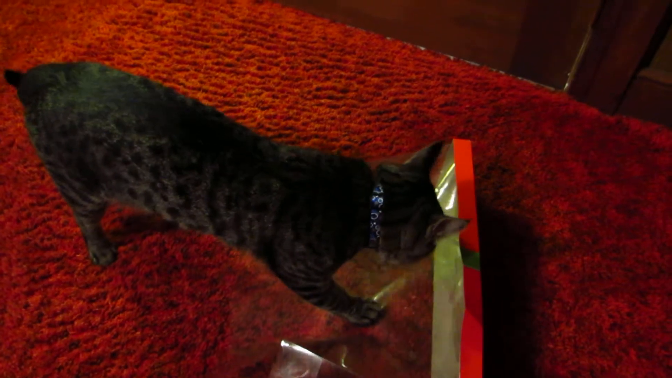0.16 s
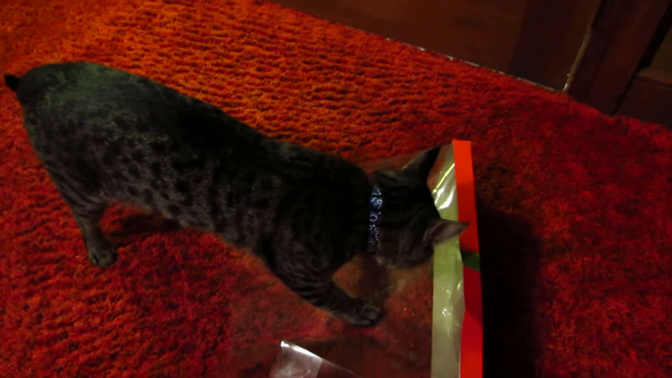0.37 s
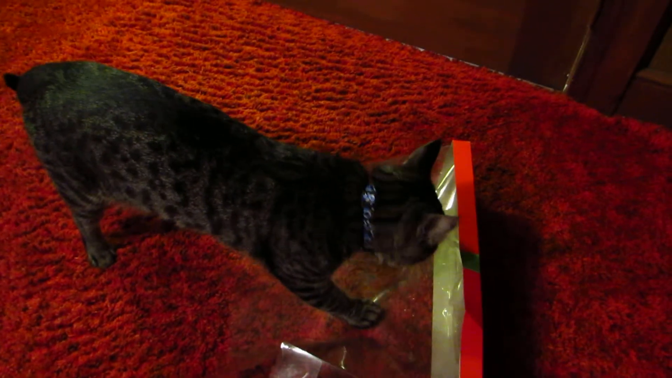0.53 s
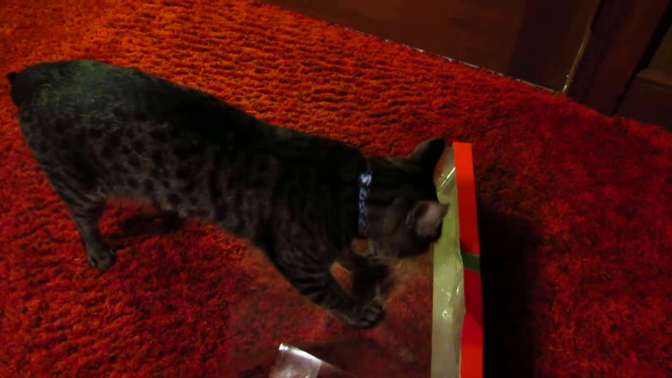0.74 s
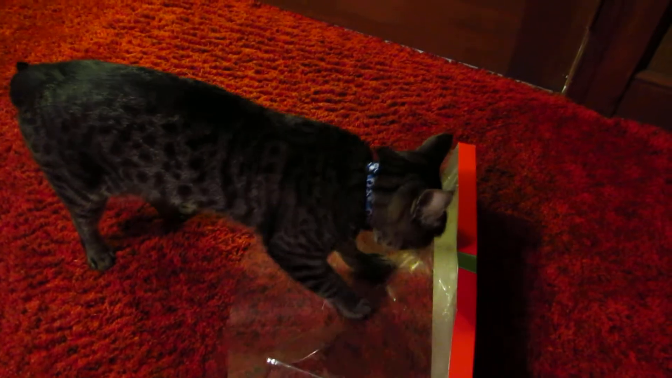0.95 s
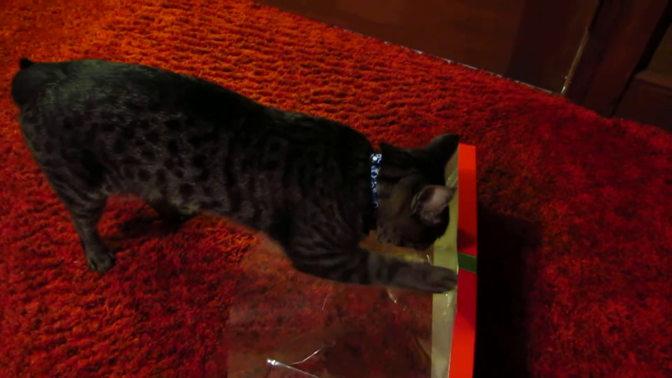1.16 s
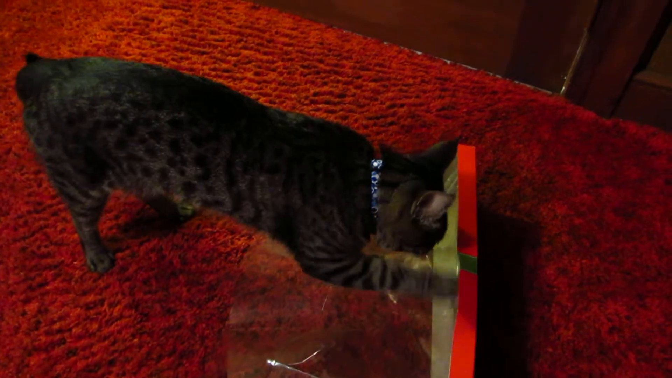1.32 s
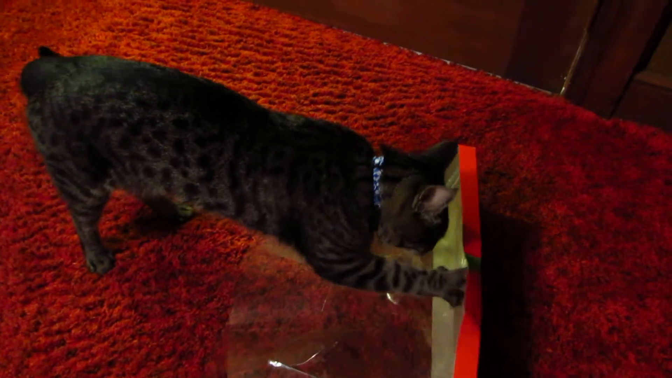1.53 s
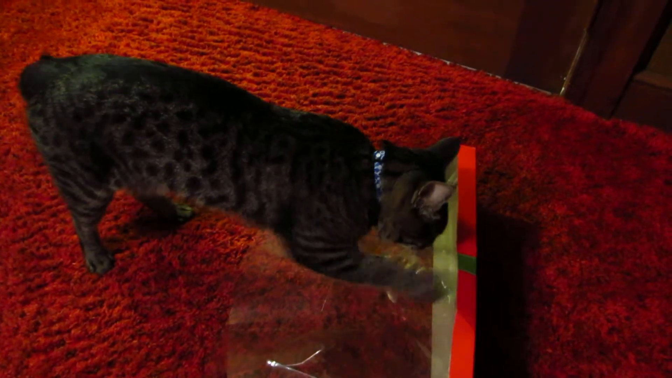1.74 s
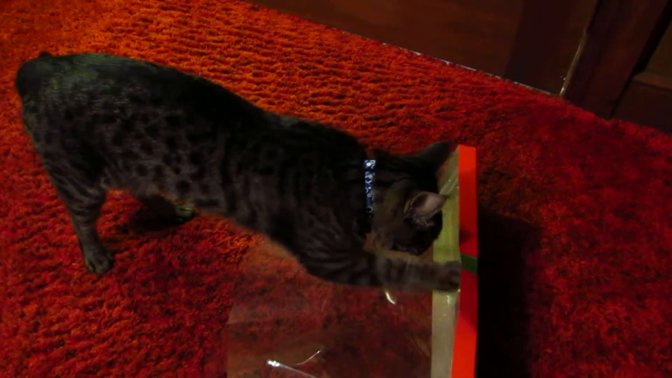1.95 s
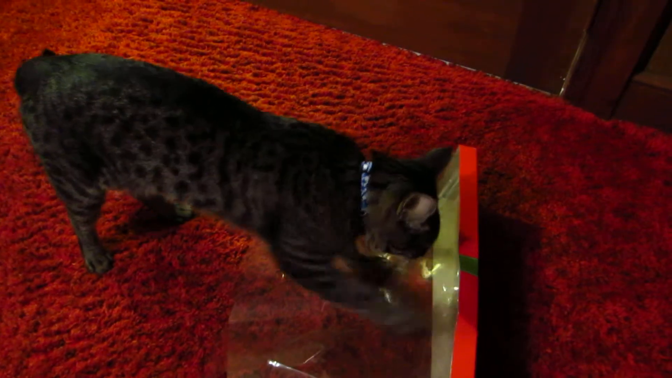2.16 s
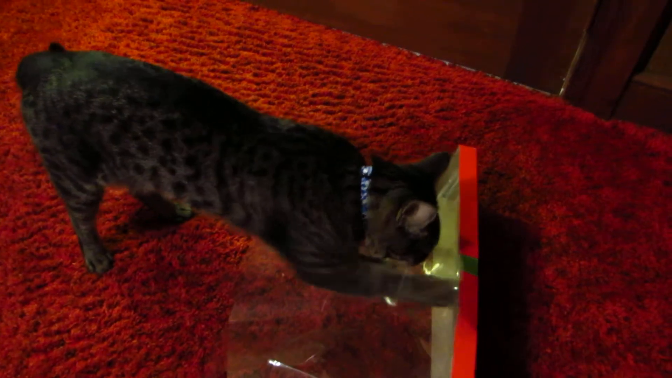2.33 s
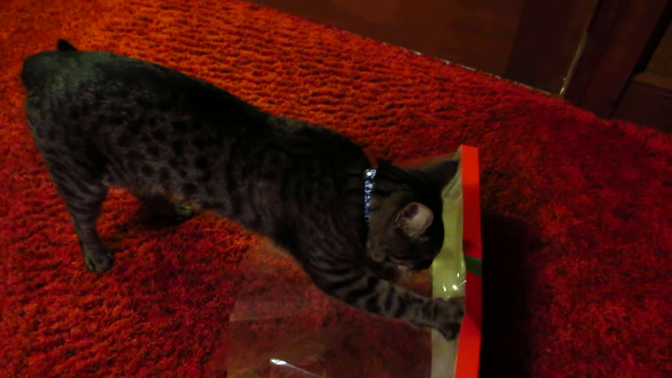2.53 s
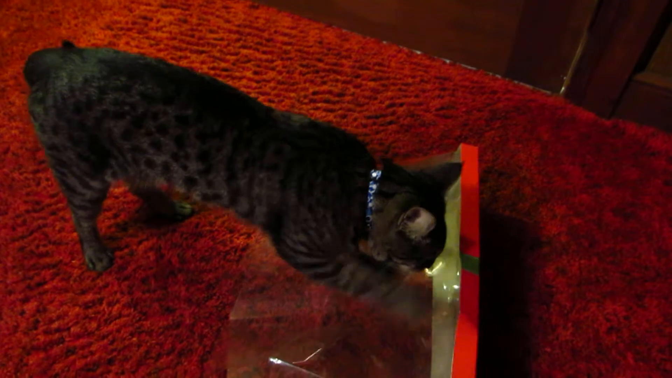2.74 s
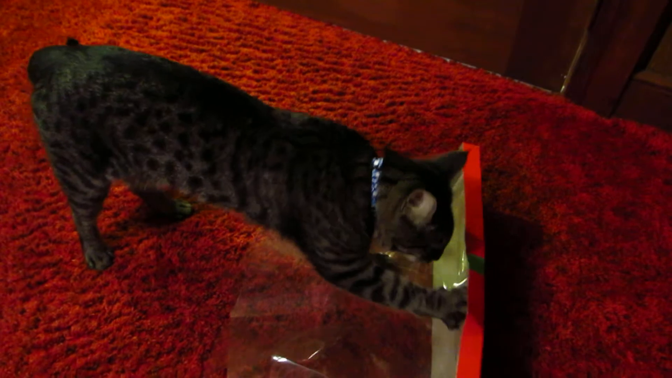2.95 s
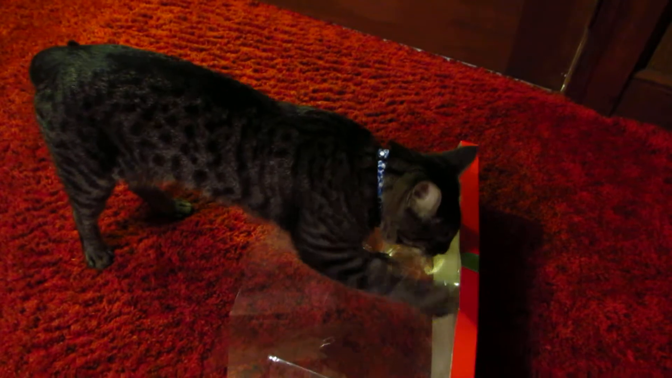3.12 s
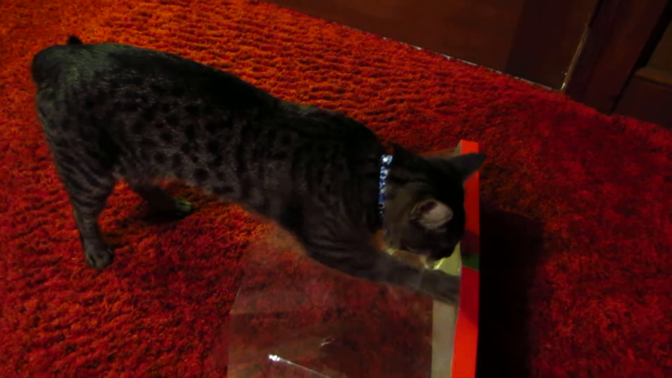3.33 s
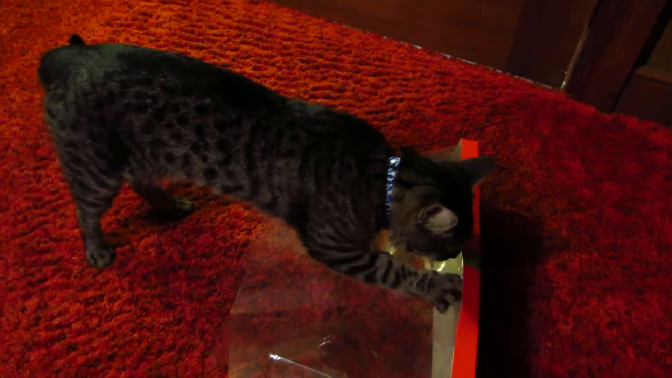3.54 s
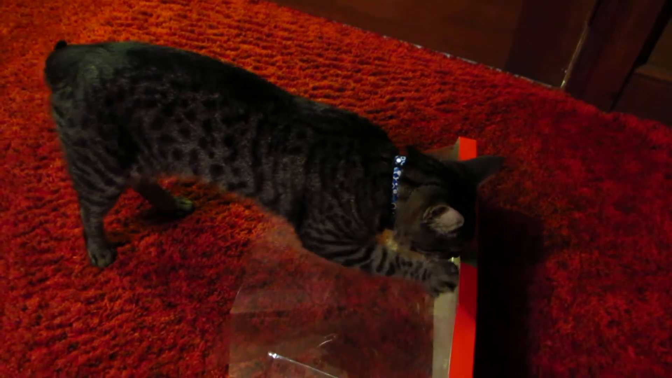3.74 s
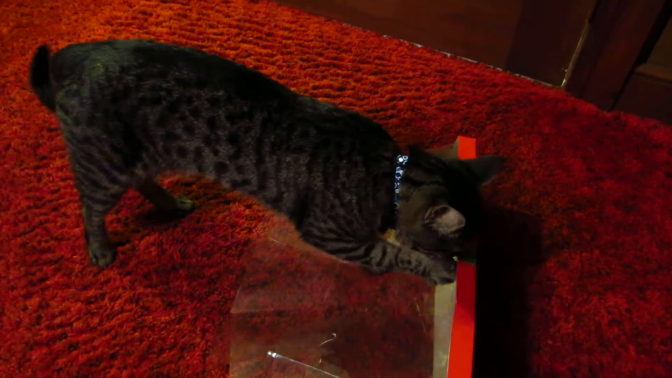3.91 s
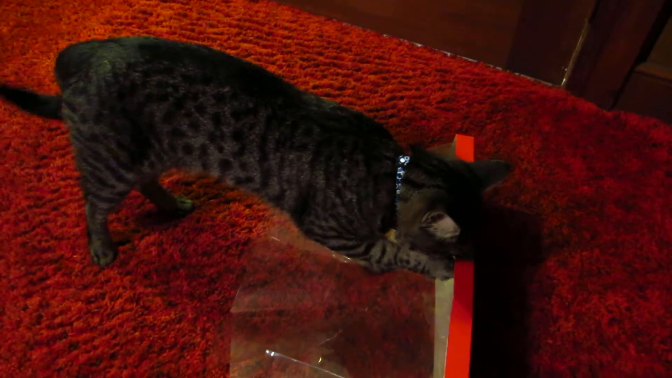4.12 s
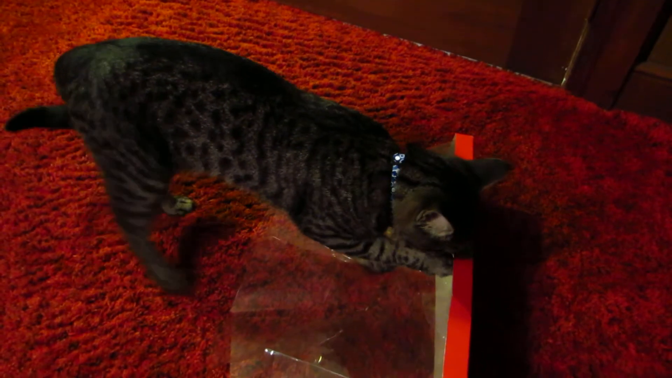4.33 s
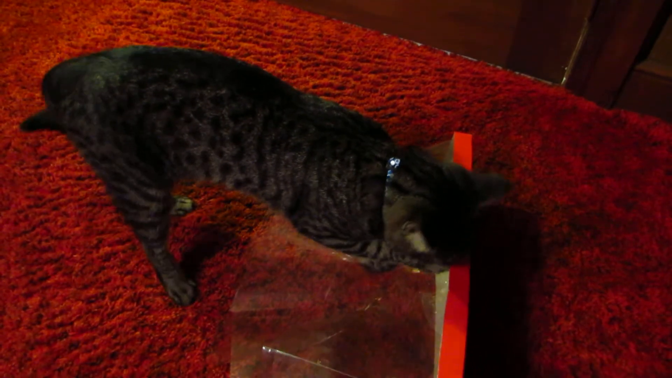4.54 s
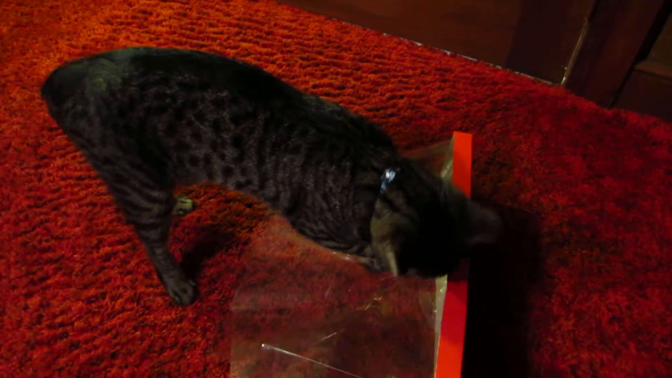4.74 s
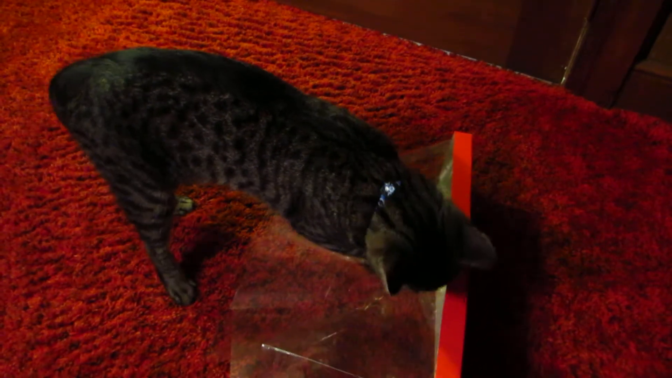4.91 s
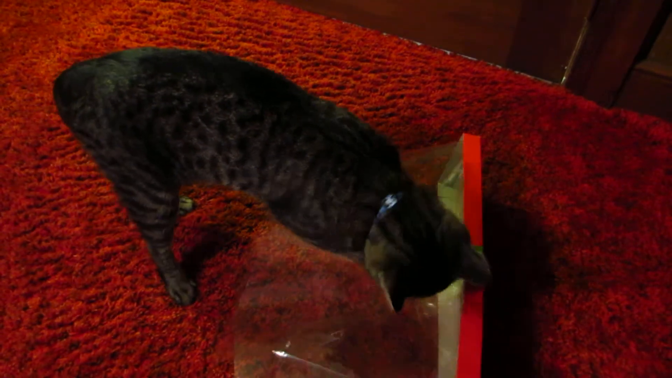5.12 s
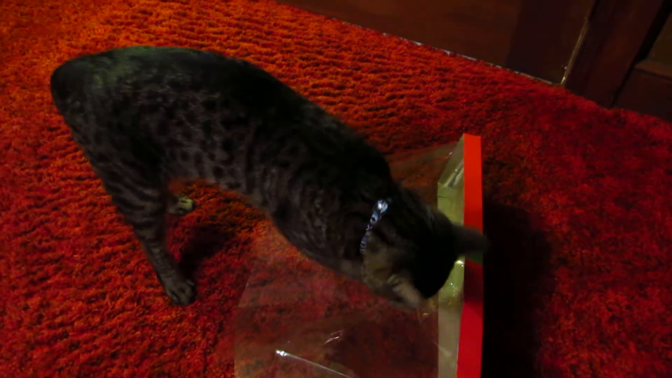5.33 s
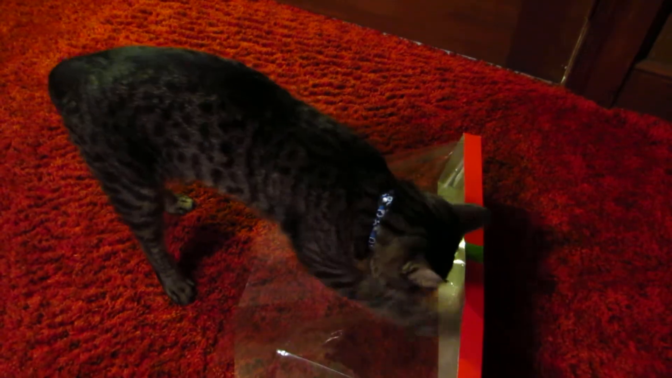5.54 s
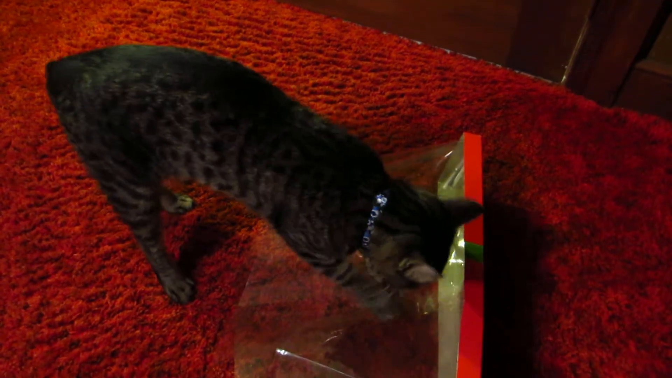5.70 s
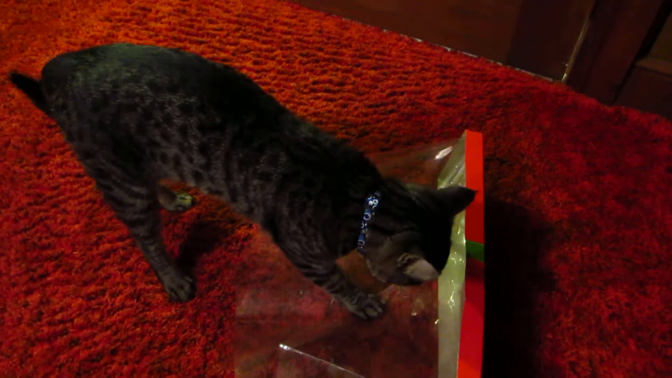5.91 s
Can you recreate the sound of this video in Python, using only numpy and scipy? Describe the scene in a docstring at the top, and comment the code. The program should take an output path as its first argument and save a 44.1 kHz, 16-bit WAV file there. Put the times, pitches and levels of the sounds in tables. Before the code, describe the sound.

In a small quiet room, a cat paws at stiff plastic film stretched over a light cardboard box on carpet, heard closely in stereo. At 0 s a short faint slide and light taps sit over soft, low room hush, with small touches until 0.65 s. A hard, clicky knock lands at 0.7 s, followed by quick hollow thuds near 0.9 s. Pawing continues unevenly: lighter around 1.3 s, firmer at 1.65 and 2.0 s, then dense from 2.4 to 3.4 s with boxy thumps, dry claw ticks and brief hissing rubs. The strongest strikes come around 3.05-3.1 s. After softer pats, a sharp crack at 4.15 s leads into a lull. Single bursts snap at about 4.75 and 5.1 s, the latter brightest. Light thuds, scratches and slides from 5.45 s fade into small touches by 6 s. Short room tails follow the hits.

```python
"""A cat paws at a stiff plastic film stretched on a cardboard box lying on a carpet.
First a short slide hisses over the quiet hush of a small room, with light thuds and claw ticks.
From a hard knock at 0.7 s the pawing is busy until 4.2 s, then comes in bursts near 4.8 and 5.1 s,
and light thuds, ticks and slides end it. Thuds and ticks are uneven slips that shake box and film;
slides and hush are coloured noise; scattered echoes and room tails answer each hit."""
import sys
import numpy as np
from scipy import signal
from scipy.fft import rfft, irfft, next_fast_len
from scipy.io import wavfile
from scipy.ndimage import uniform_filter1d

SR = 44100
rng = np.random.default_rng(int(sys.argv[2]) if len(sys.argv) > 2 else 0)


def inscribe(sig):
    """Save sig as 16-bit PCM at rate SR to the path in sys.argv[1].

    A 1-D sig is mono; a 2-D sig holds one channel per row.
    Samples are clipped to [-1, 1] before scaling.
    """
    pcm = np.round(np.clip(np.atleast_2d(sig).T, -1, 1) * 32767)
    wavfile.write(sys.argv[1], SR, pcm.astype(np.int16))


def elevation(decibels):
    """Turn decibel levels (scalar or array-like) into linear amplitude ratios."""
    levels = np.asarray(decibels, float)
    return 10 ** (levels / 20)


N = 267687  # length in samples

# Pads and fur sliding on the film, one stroke a row.
# Each row: start in seconds, length in seconds, level at the start in dB, level at the end in dB.
STROKES = [(0, 0.02, -49, -44), (0.256, .22, -58.5, -53), (0.803, .21, -46, -57), (1.334, 0.47, -69, -55),
           (1.966, 0.24, -51, -57), (2.352, 0.11, -41.5, -52), (2.43, 0.3, -48, -50.5),
           (2.84, 0.12, -55, -44), (3.042, 0.17, -45, -58), (3.355, 0.06, -38, -54),
           (3.596, 0.035, -45, -45.5), (3.9, .5, -58, -66), (5.504, 0.096, -46, -45), (5.75, 0.1, -57, -49),
           (5.887, 0.097, -46, -47.5), (6.028, .04, -52, -52)]
STROKE_RISE_S, STROKE_FADE_DB_PER_S = 0.014, 400
# Tone of the slide. Each row: frequency in Hz, relative level per Hz in dB.
SLIDE_COLOUR = [(400, -1), (1200, 2.5), (3000, 6), (5000, -1), (9000, -5.5), (13000, -9.5), (15500, -44)]

# Level of the hush, which swells slowly and dips at times. Each row: time in seconds, level in dB.
HUSH_LEVEL = [(0, -50), (.2, -55.5), (.55, -52.5), (.7, -47), (1.1, -49), (1.5, -45), (2.8, -43.5),
              (3.7, -41.5), (4.2, -44.5), (5.08, -42.5), (5.45, -49.5), (5.72, -44), (6.07, -41.5)]
# Tone of the hush. Each row: frequency in Hz, relative level per Hz in dB.
HUSH_COLOUR = [(15, -37), (25, 3.5), (180, -3), (394, 0), (677, -4.5), (936, -9), (1130, -9), (1230, -10.5),
               (3340, -17.5), (3920, -20.5), (6560, -22), (13200, -34.5), (16000, -45.5)]
# How alike the hush is at the two microphone ports. Each row: frequency in Hz, likeness from 0 to 1.
HUSH_SAME = [(60, 0), (400, 0), (2000, 0), (10000, 0.15)]

# Paw thuds. Each row: start in seconds, level in dB, level of the low box modes over that in dB,
# hardness in dB (gain on the high modes), time for the contact to fade by 60 dB in seconds.
PAWS = [(0.001, -29.5, -32, 0, 0.11), (0.015, -32.5, -26, 11, 0.24), (0.212, -41, -17, -15, 0.15),
        (0.239, -48.5, 5, -19, 0.024), (0.279, -45, 1, -14, .093), (0.343, -31, -10, -40.5, 0.024),
        (0.618, -34, -27, -3, 0.094), (0.632, -39.5, 0.5, -22, .056), (0.713, -10, -40, 25.5, .048),
        (0.853, -19.5, -20, 1, 0.02), (0.859, -14, -18, 4, 0.047), (0.875, -15.5, -7, 18, 0.027),
        (0.887, -23.5, -3, 9, 0.16), (1.225, -45, -1, 1, 0.086), (1.279, -26, -18, -14, 0.025),
        (1.288, -19.5, -16, -25, 0.063), (1.351, -42.5, 5, -21, .062), (1.465, -26.5, -14, -3, 0.092),
        (1.594, -27.5, -6.5, -8, 0.089), (1.641, -14.5, -21, 19.5, 0.052), (1.66, -23, -11, 2, 0.056),
        (1.72, -23.5, -7, -3, 0.16), (1.936, -38, -14, 0, 0.27), (1.992, -25, -14, 5, 0.055),
        (2.003, -15.5, -6.5, 7.5, 0.098), (2.112, -25, -9, 13, 0.056), (2.124, -17.5, -13, -10, 0.087),
        (2.184, -36, -1, -19, 0.031), (2.383, -28.5, -16, 12, 0.23), (2.405, -20, -32, -9, 0.023),
        (2.413, -14, -35, -11, 0.031), (2.424, -19, -26, -29, 0.065), (2.469, -19.5, -16, -23, 0.078),
        (2.567, -20, -9, -20, 0.014), (2.609, -15.5, -2, -4, 0.093), (2.871, -18, -12, 14, 0.036),
        (2.88, -15, -24, -23, 0.1), (2.916, -21, -8, -0.5, 0.04), (2.946, -22, -13, 2, 0.041),
        (3.021, -26, -11, -13, 0.055), (3.044, -10.5, -21, 9, 0.034), (3.05, -16.5, -33, -11, 0.024),
        (3.089, -10.5, -1.5, 28, 0.0071), (3.108, -21.5, -23, -16, 0.1), (3.129, -34, -11, 0, 0.027),
        (3.333, -31.5, -13, -9, 0.21), (3.375, -19, -29, -4, 0.03), (3.384, -14.5, -17, -17, 0.077),
        (3.422, -27.5, -3, -27.5, 0.013), (3.557, -19.5, -32, -42, 0.027), (3.603, -22, -12, -1.5, 0.13),
        (3.628, -25, -5, -9, 0.046), (3.72, -37.5, -21, -11, 0.11), (4.085, -38, -1, -27, 0.046),
        (4.15, -11.5, -8.5, 16.5, 0.036), (4.753, -13.5, -33, 13, 0.043), (4.764, -14.5, -5.5, 19, 0.024),
        (5.068, -21.5, -26, -22, .014), (5.077, -20, -19, -15, .036), (5.094, -17, -27, 12, 0.056),
        (5.104, -15.5, -10.5, 23, 0.044), (5.116, -20, -11, 6, 0.12), (5.459, -33, -10, -4, 0.065),
        (5.506, -25.5, -24, -12, 0.024), (5.512, -19.5, -22, -22.5, 0.015), (5.537, -29, -15, -19, 0.017),
        (5.552, -28.5, -26, -19, 0.028), (5.742, -34, -22, 25, 0.039), (5.815, -30.5, -11, -11, 0.049),
        (5.833, -28, -2.5, -16.5, 0.02)]
# A pad lands over PAD_RISE_S; each dB of hardness shortens that by PAD_QUICKER dB.
PAD_RISE_S, PAD_QUICKER = 0.0031, 0.232
# Ringing modes of the cardboard box.
# Each row: frequency in Hz, relative level in dB, time to fade by 60 dB in seconds.
BOARD = [(150, -18.5, 0.07), (220, -8.5, 0.072), (254, -1, 0.043), (364, 10, 0.098), (497, 7, 0.063),
         (535, 23, 0.056), (598, 19, 0.033), (645.7, 19, 0.1), (696, 31.5, 0.024), (763, 29, 0.03),
         (970, 15, 0.029), (1081, 35, 0.0098), (1243, 15, 0.0025), (1410, 27, 0.0015), (1410, 28.5, 0.0037),
         (1645, 5.5, 0.022), (1550, 29.5, 0.0016), (2050, 29, 0.0018), (2220, -8.5, 0.008)]
# The floor under the box thumps faintly; FLOOR_DB is relative to the thud.
FLOOR_HZ, FLOOR_DB, FLOOR_T60_S = 84, -28, .12

# Claw ticks. Each row: start in seconds, level in dB, brightness in dB (gain on the treble),
# time for the skid to fade by 60 dB in seconds.
CLAWS = [(0.001, -35, -24, .054), (0.023, -37.5, -19, 0.12), (0.212, -45.5, -12, 0.078),
         (0.621, -40, -10, 0.045), (0.671, -49, -10, .027), (0.717, -20, -25, 0.023),
         (0.718, -16.5, -18.5, 0.026), (0.859, -29, -0.5, 0.022), (0.866, -31, -7, 0.11),
         (0.887, -24.5, -38, 0.02), (1.224, -42, -18, 0.054), (1.293, -44, -10, 0.042),
         (1.362, -43.5, -8, 0.046), (1.44, -46, -1, 0.097), (1.46, -32.5, -6, 0.054),
         (1.531, -39.5, -13.5, .03), (1.594, -37.5, -18, 0.033), (1.643, -19.5, -42, 0.052),
         (1.723, -23.5, -15.5, 0.037), (1.737, -24.5, -11.5, 0.037), (1.953, -31, -11.5, 0.063),
         (2.002, -26.5, -12, .06), (2.115, -36, -7, 0.025), (2.125, -22, -6.5, 0.045),
         (2.351, -34, -7.5, .029), (2.38, -37, -10, .029), (2.393, -32, -10, .032), (2.479, -29, -9, 0.028),
         (2.543, -50, -20, .029), (2.619, -16, -11, 0.033), (2.834, -21, -9.5, 0.015),
         (2.841, -29, -11, 0.046), (2.859, -28, -16, 0.044), (2.943, -31, -25, 0.051),
         (2.954, -34, -8, 0.04), (3.046, -27.5, -17, 0.039), (3.09, -16.5, -45, 0.01),
         (3.109, -31, -9, 0.023), (3.12, -21.5, -13, 0.038), (3.18, -38, -11, 0.093),
         (3.336, -40.5, -7, 0.057), (3.359, -33.5, -32, 0.035), (3.403, -33.5, -9.5, .026),
         (3.615, -36.5, -8.5, 0.05), (3.733, -44, -22, 0.088), (4.151, -10.5, -19, 0.017),
         (4.755, -18.5, -27.5, 0.031), (5.07, -32.5, -49, .016), (5.095, -9, -14.5, 0.011),
         (5.103, -20.5, 5, 0.0077), (5.463, -34.5, -11, 0.053), (5.504, -40.5, -20, 0.041),
         (5.55, -38.5, -27, 0.041), (5.589, -42, -9, 0.077), (5.624, -40.5, -12, .037),
         (5.746, -29.5, -11.5, 0.01), (5.955, -39.5, -4, 0.021), (6.052, -43.5, -9, 0.026)]
CLAW_RISE_S = 0.0009
# Tone of the film under a claw. Each row: frequency in Hz, relative level per Hz in dB.
FILM = [(500, -30.5), (1200, -9.5), (2000, -4.5), (2700, -4.5), (3400, -9.5), (4300, -9.5), (6000, -10),
        (9000, -14), (13000, -19), (16000, -39)]

LEAD_S = 2.0e-5  # the left port hears the box first
# Share of the direct sound that nearby surfaces scatter differently to each port.
# Each row: frequency in Hz, level in dB.
SCATTER = [(500, -32), (3000, -22), (5000, -11), (12000, -9)]
# How fast the room tail dies. Each row: frequency in Hz, time to fade by 60 dB in seconds.
ROOM_T60 = [(100, 0.099), (260, 0.37), (700, 0.35), (1840, 0.25), (4850, 0.27), (12800, 0.21)]
# How alike the tail is at the two ports. Each row: frequency in Hz, likeness from 0 to 1.
ROOM_SAME = [(100, 0.87), (1000, 0.89), (4000, 0.8), (12000, 0.55)]

# Balance of the two ports. Each row: frequency in Hz, left over right in dB.
LEAN = [(60, 1), (240, -2.5), (950, -2.0), (3770, -2), (15000, -1)]
# Narrow dips of the microphone. Each row: centre in Hz, width in Hz, gain in dB.
DIPS = [(3980, 215, -9), (8030, 110, -10)]


def evened(x):
    """Scales a signal to an average (rms) level of 1."""
    return x / np.sqrt(np.mean(x ** 2) + 1e-20)


def read(points, hz):
    """Reads a table at the given frequencies, on a log-frequency axis."""
    f, value = np.transpose(points)
    return np.interp(np.log(hz + 1), np.log(f + 1), value)


def level(rows):
    """Turns rows of time and dB into a gain over time."""
    s, db = np.transpose(rows)
    return elevation(np.interp(np.arange(N) / SR, s, db))


def add(mix, s, sound):
    """Mixes a sound in at time s."""
    part = mix[max(round(s * SR), 0):][:len(sound)]
    part += sound[:len(part)]


def peaked(x, db):
    """Sets the loudest 5 ms to the given level."""
    return elevation(db) * x / np.sqrt(uniform_filter1d(x ** 2, size=220).max() + 1e-20)


def causal(db):
    """Makes a short filter with no sound before its start, from a gain in dB on 1025 bins."""
    log = np.log(elevation(np.r_[db, db[-2:0:-1]]))
    return np.fft.ifft(np.exp(log - 1j * signal.hilbert(log).imag)).real[:1024]


def pair(z, same):
    """Makes the second of two spectra partly alike the first."""
    same = np.clip(same, 0, 1)[:, None]
    return np.array([z[0], same * z[0] + np.sqrt(1 - same ** 2) * z[1]])


def noise(colour, same, patchy_db):
    """Makes coloured noise for two ports, with patches of time and pitch that drift in level."""
    frames, hz = N // 256 + 5, np.fft.rfftfreq(1024, 1 / SR)
    a, b, c, d, patches = rng.standard_normal((frames, 513, 5)).T
    patches = uniform_filter1d(patches, size=24, axis=0)  # smooth over frequency
    patches = evened(uniform_filter1d(patches, size=6, axis=1))  # smooth over time
    gain = elevation(read(colour, hz)[:, None] + patchy_db * patches)
    z = pair([a + 1j * b, c + 1j * d], read(same, hz)) * gain
    return evened(signal.istft(z, nperseg=1024, noverlap=768)[1][:, :N])


def strokes():
    """Gain of the slide: each stroke rises, glides from one level to the other and fades."""
    start, length, from_db, to_db = np.transpose(STROKES)[:, :, None]
    t = np.arange(N) / SR - start
    glide_db = from_db + (to_db - from_db) * np.clip(t / length, 0, 1)
    fade_db = STROKE_FADE_DB_PER_S * np.maximum(t - length, 0)
    gains = np.clip(t / STROKE_RISE_S, 0, 1) * elevation(glide_db - fade_db)
    return np.linalg.norm(gains, axis=0)  # overlapping strokes add as powers


def slide():
    """Fur and pads rub the film: a soft hiss that follows the strokes."""
    return strokes() * noise(SLIDE_COLOUR, [(1000, 1.0), (10000, 0.63)], patchy_db=0.6)


def hush():
    """The quiet room: coloured noise that rises and falls in level."""
    return level(HUSH_LEVEL) * noise(HUSH_COLOUR, HUSH_SAME, patchy_db=1.0)


def contact(rise, t60, per_s, spread_db):
    """Uneven slips of a contact that builds up and then lets go, slowly at first and then faster."""
    t = np.arange(6000) / SR
    hit, size, sign = rng.random((6000, 3)).T
    slips = (hit < per_s / SR) * elevation(-spread_db * np.log(1 - .99 * size)) * np.sign(sign - .5)
    slips[0] = elevation(3.3 * spread_db)  # the first slip is sure
    rise = max(rise, 1e-4)
    build = np.minimum((t + 1e-4) / rise, 1)
    let_go = elevation(-60 * (np.maximum(t - rise, 0) / max(t60, .004)) ** 1.315)
    z = rfft(slips * build * let_go)
    # Evens the broad spectrum of the slips, so each hit keeps its set colour.
    broad = np.sqrt(abs(uniform_filter1d(abs(z) ** 2, size=60)) + 1e-12)
    return irfft(z / broad)[:5400]


def paws():
    """The weight of the paw pushes the low box modes once; its slips shake the higher ones."""
    out, t = np.zeros(N), np.arange(3000) / SR
    hz, mode_db, t60 = np.transpose(BOARD)[:, :, None]
    low = hz[:, 0] < 270
    # A small box and a soft pad give no deep bass and no treble.
    radiates = signal.butter(4, [135, 2600], "band", fs=SR, output="sos")
    for s, db, weight_db, hard_db, hold in PAWS:
        rise = PAD_RISE_S / elevation(PAD_QUICKER * hard_db)
        # Each thud varies the modes a little in level and pitch.
        spot, detune = rng.standard_normal((2, len(BOARD), 1))
        tilt_db = read([(900, 0), (1700, hard_db)], hz)
        ring_gain = elevation(mode_db + tilt_db + 2.0 * spot - 60 * t / t60)
        rings = ring_gain * np.sin(2 * np.pi * hz * (1 + 0.028 * detune) * t)
        slips = contact(rise, hold, per_s=4000, spread_db=3.5)
        thud = signal.fftconvolve(slips, rings[~low].sum(0))
        push = rings[low].sum(0)
        floor = elevation(db + FLOOR_DB - 60 * t / FLOOR_T60_S) * np.sin(2 * np.pi * FLOOR_HZ * t)
        floor *= np.minimum(t * FLOOR_HZ, 1)  # swells in over one cycle
        add(out, s, peaked(signal.sosfilt(radiates, thud), db))
        add(out, s + rise, peaked(signal.sosfilt(radiates, push), db + weight_db))
        add(out, s + rise, floor)
    return out


def claws():
    """A claw skids in fast slips; a sharper catch tilts the film sound to the treble."""
    out, hz = np.zeros(N), np.fft.rfftfreq(2048, 1 / SR)
    for s, db, bright_db, skid in CLAWS:
        film = causal(read(FILM, hz) + read([(3800, 0.004), (8000, bright_db)], hz))
        slips = contact(CLAW_RISE_S, skid, per_s=8200, spread_db=5.0)
        add(out, s, peaked(signal.fftconvolve(slips, film), db))
    return out


def direct(x):
    """Sound straight from the box, reaching the right port a moment after the left."""
    size = next_fast_len(N + 64)
    delay = np.exp(-2j * np.pi * np.fft.rfftfreq(size, 1 / SR) * LEAD_S)
    late = irfft(rfft(x, size) * delay, size)[:N]
    return np.array([x, late])


def scatter(x):
    """Nearby surfaces return a few milliseconds of treble echoes, different at each port."""
    taps = rng.standard_normal((2, 1024)) * elevation(-60 * np.arange(1024) / SR / 0.0035)
    taps = taps / np.linalg.norm(taps, axis=1, keepdims=True)
    colour = causal(read(SCATTER, np.fft.rfftfreq(2048, 1 / SR)))
    taps = signal.fftconvolve(taps, colour[None], axes=1)
    return signal.oaconvolve(x[None], taps, axes=1)[:, :N]


def room(x):
    """Dense tails, each band dying at its own speed; three different tails take turns,
    which keeps the reverberation smooth."""
    hz, t, z = signal.stft(rng.standard_normal((3, 2, SR // 2)), SR, nperseg=256)
    out = np.zeros((2, N))
    turn = 2 * np.pi * 23 * np.arange(N) / SR  # 23 turns a second
    fade = elevation(-60 * t / read(ROOM_T60, hz)[:, None])
    for k in range(3):
        tail = signal.istft(pair(z[k], read(ROOM_SAME, hz)) * fade, SR, nperseg=256)[1]
        tail[:, :round(.004 * SR)] = 0  # silent until the first wall answers
        tail = tail / np.linalg.norm(tail[0])
        share = x * np.cos(turn + k * 2 * np.pi / 3) * np.sqrt(2 / 3)
        out += signal.fftconvolve(share[None], tail, axes=1)[:, :N]
    return out


def scene():
    """Adds the slide, the hush, and the thuds and ticks with their scatter and room tail."""
    background = slide() + hush()
    hits = paws() + claws()
    return background + direct(hits) + scatter(hits) + elevation(-9.5) * room(hits)


def roll_off(x):
    """The treble ends steeply here."""
    return signal.sosfilt(signal.butter(12, 16470, fs=SR, output="sos"), x)


def record(dry):
    """Two microphone ports differ in balance, share narrow dips and clip at full scale."""
    hz = np.fft.rfftfreq(2048, 1 / SR)
    dips_db = sum(db * np.exp(-((hz - f) / width) ** 2) for f, width, db in DIPS)
    lean_db = read(LEAN, hz) / 2  # half to each port, with opposite signs
    ports = np.array([causal(dips_db + side * lean_db) for side in (1, -1)])
    heard = signal.oaconvolve(dry, ports, axes=1)[:, :N]
    mix = np.clip(heard, -1, 1)
    return roll_off(mix)


dry = scene()
out = record(dry)
inscribe(out)
```